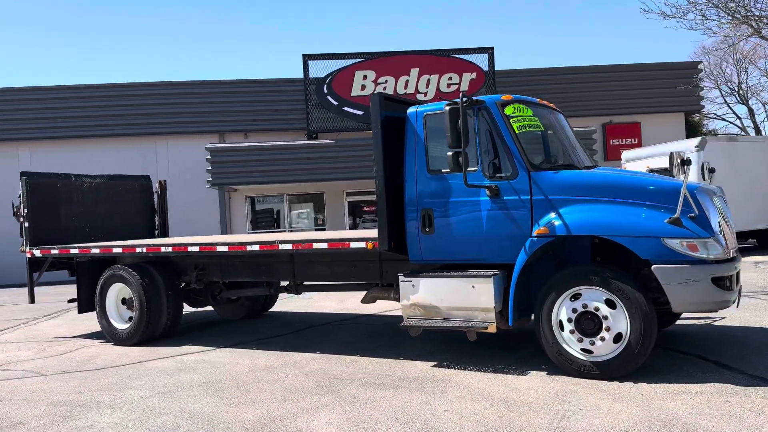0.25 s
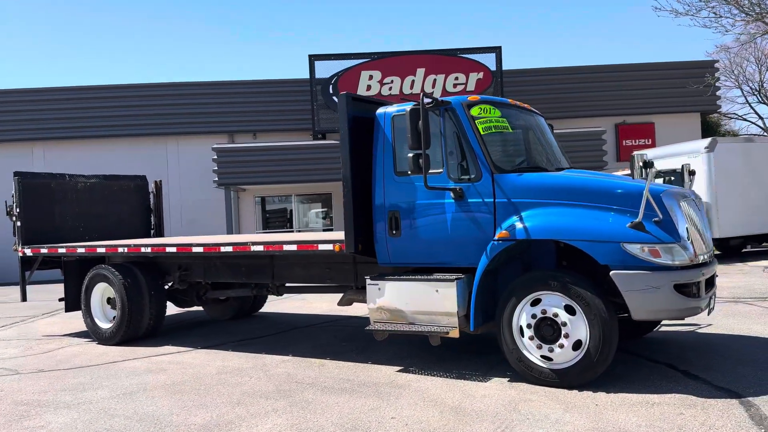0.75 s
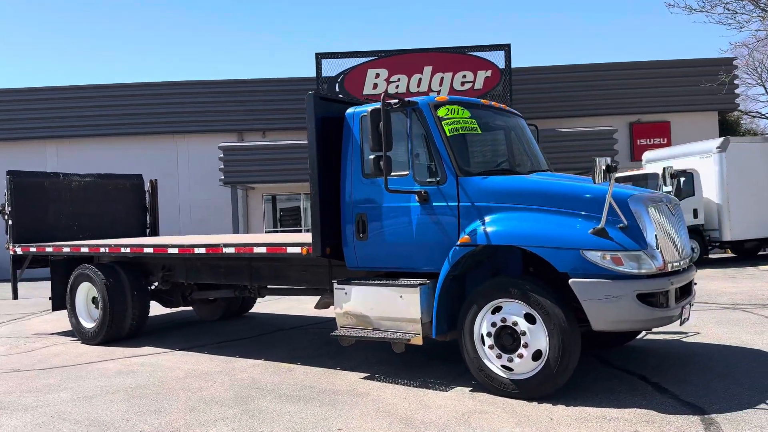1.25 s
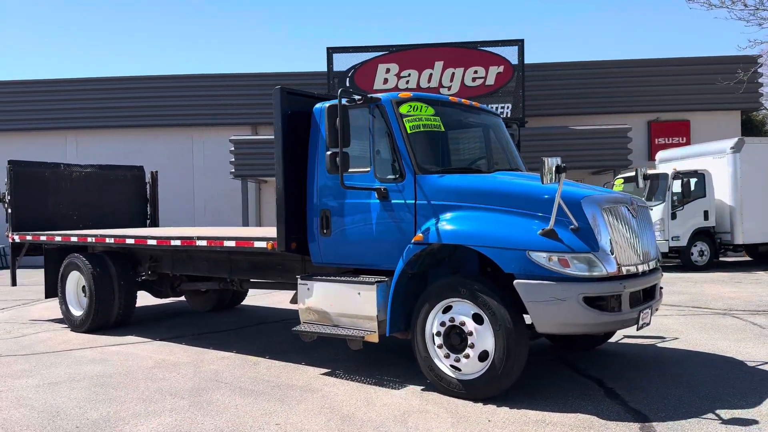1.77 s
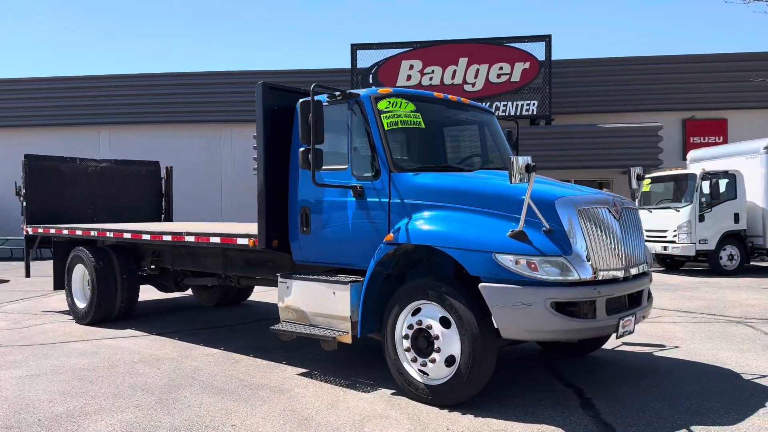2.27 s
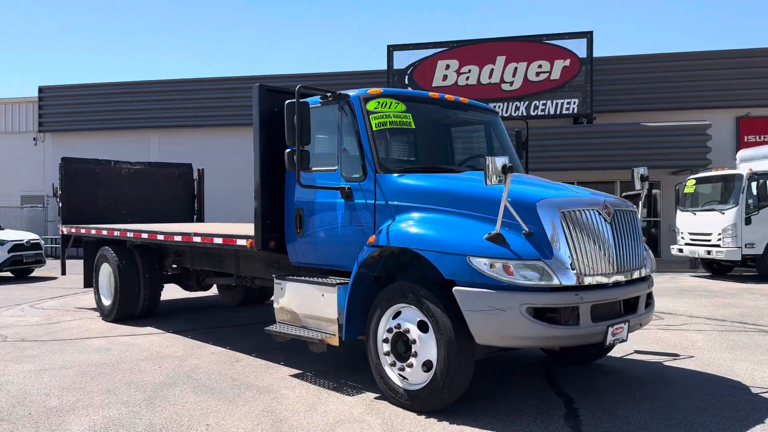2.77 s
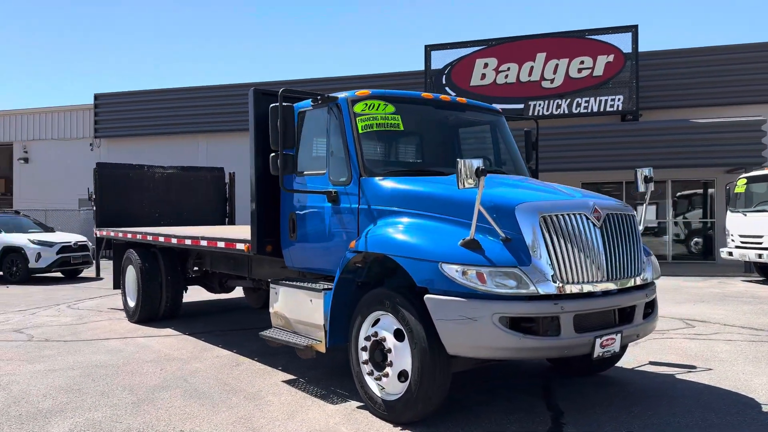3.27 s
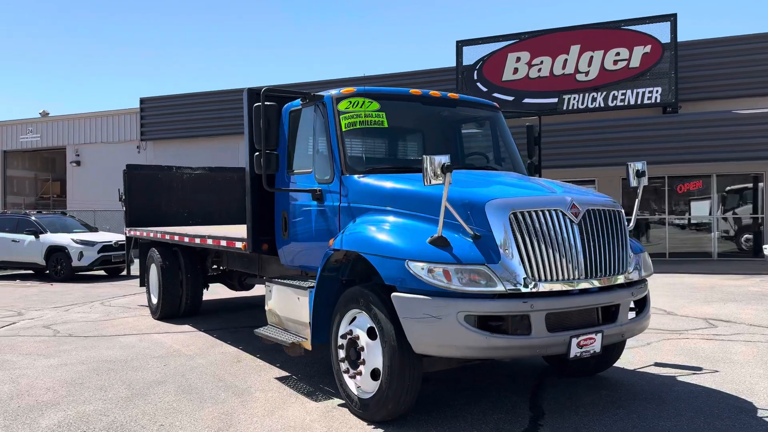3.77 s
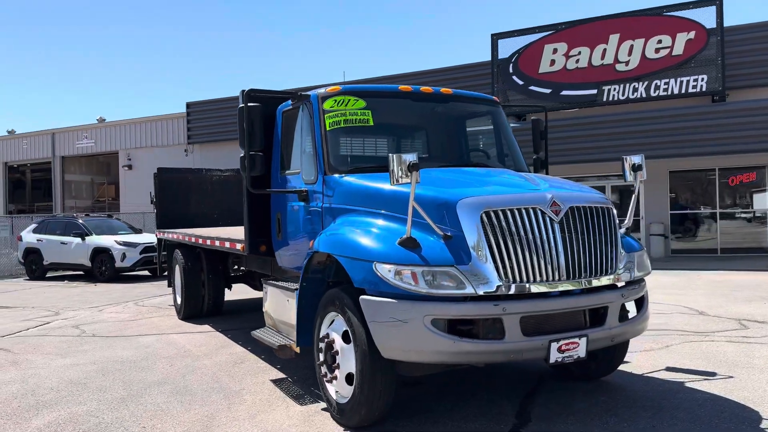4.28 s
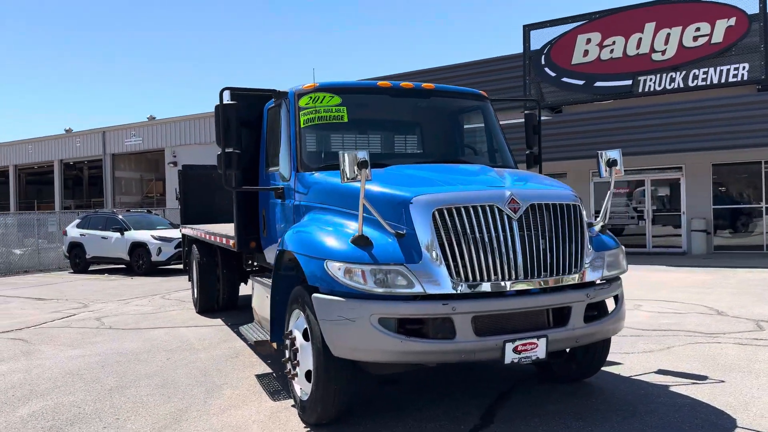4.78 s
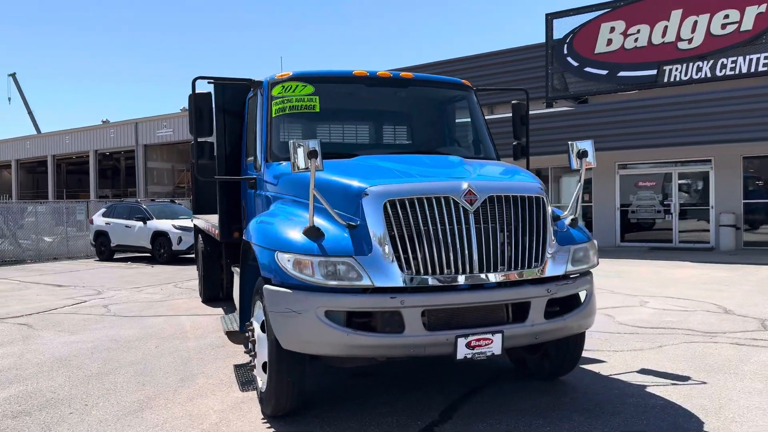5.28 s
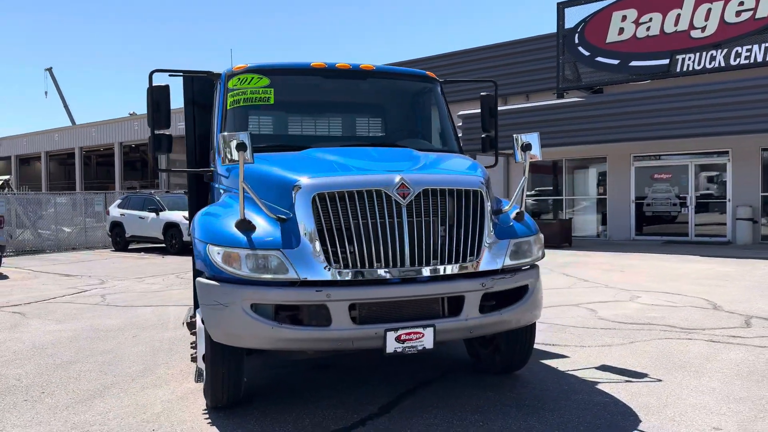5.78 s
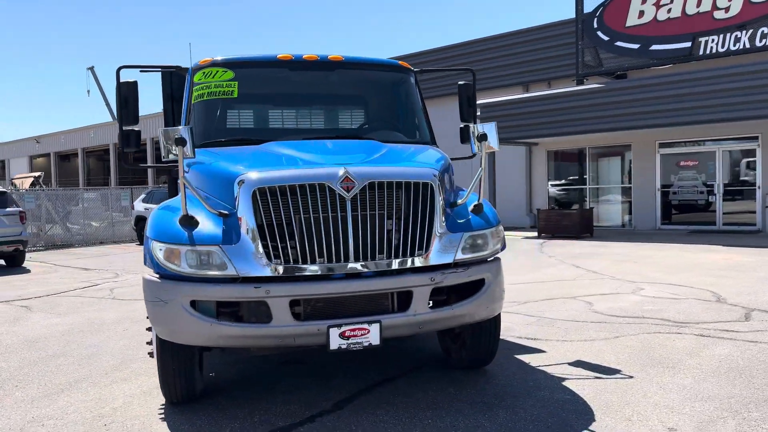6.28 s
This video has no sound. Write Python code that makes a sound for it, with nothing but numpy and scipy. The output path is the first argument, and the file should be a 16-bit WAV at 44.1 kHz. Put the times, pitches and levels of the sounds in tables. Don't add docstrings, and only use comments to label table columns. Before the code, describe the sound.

Close-up rattling diesel idle, ticking injectors and fan roar, swelling gradually as low wind thumps and hollow blowing come and go.

```python
import sys
import numpy as np
from scipy import signal
from scipy.fft import rfft, irfft
from scipy.io import wavfile
from scipy.ndimage import uniform_filter1d

SR = 44100
rng = np.random.default_rng(int(sys.argv[2]) if len(sys.argv) > 2 else 0)


def master_out(mix):
    frames = np.transpose(np.atleast_2d(mix))
    ceiling = np.clip(frames, -1, 1)
    pcm = np.round(ceiling * 32767).astype(np.int16)
    wavfile.write(sys.argv[1], SR, pcm)


def gain_from_decibels(decibels):
    exponent = np.asarray(decibels, float) / 20
    return 10 ** exponent


N = 288414
TIME = np.arange(N) / SR
CYCLE_HZ, FIRST_S = 6.259, .0225


def curves(table):
    s, *columns = np.transpose(table)
    return [np.interp(TIME, s, column) for column in columns]


def unit(x):
    return x / np.sqrt(np.mean(x ** 2))


def noise():
    return rng.standard_normal((2, N))


def colour(x, points):
    hz, db = np.transpose(points)
    grid_hz = np.maximum(np.arange(N // 2 + 1) * SR / N, 1)
    gain_db = np.interp(np.log(grid_hz), np.log(hz), db, -np.inf, -np.inf)
    return unit(irfft(rfft(x) * gain_from_decibels(gain_db), N))


def ring(x, hz, width_hz):
    return signal.lfilter(*signal.iirpeak(hz, hz / width_hz, SR), x) / np.sqrt(np.pi * width_hz / SR)


def walk(rate_hz):
    hold = int(SR / rate_hz)
    steps = np.repeat(rng.standard_normal(N // hold + 1), hold)
    return unit(uniform_filter1d(uniform_filter1d(steps, hold), hold)[:N])


def bursts(events, cycles, trim_db, spread=0.99):
    out = np.zeros((2, N))
    phase = 2 * np.pi * spread * rng.random((len(events), 2))
    for (s, db, hz), start in zip(events, phase):
        t = np.arange(int(cycles * SR / hz)) / SR
        swell = gain_from_decibels(db + trim_db) * np.sin(np.pi * t / t[-1]) ** 2
        packet = swell * np.sin(2 * np.pi * hz * t + start[:, None])
        i = int(s * SR)
        out[:, i:i + len(t)] += packet[:, :N - i]
    return out


def firings(cylinder_db, rise_s, fall_s, scatter_db):
    rate_hz = CYCLE_HZ * len(cylinder_db)
    count = (TIME - FIRST_S + 1 / CYCLE_HZ) * rate_hz
    k = count.astype(int)
    since_s = (count - k) / rate_hz
    db = np.resize(cylinder_db, k[-1] + 1) + scatter_db * rng.standard_normal(k[-1] + 1)
    return gain_from_decibels(db)[k] * 2 * (1 - np.exp(-since_s / rise_s)) * np.exp(-since_s / fall_s)


def blows(cylinder_db, scatter_db):
    echo_s = 0.0028
    s = np.arange(FIRST_S, N / SR - .01, 1 / CYCLE_HZ / len(cylinder_db))
    chance = rng.standard_normal((len(s), 2))
    i = ((s + 0.002792 + 0.0002 * chance[:, 0]) * SR).astype(int)
    out = np.zeros((2, N))
    out[0, i] = out[1, i + int(echo_s * SR)] = gain_from_decibels(np.resize(cylinder_db, len(s)) + scatter_db * chance[:, 1])
    return out


def clatter():
    size, repeat = round(SR / CYCLE_HZ), .75
    fresh = rng.standard_normal((2, N // size + 9, size))
    cycles = signal.lfilter([np.sqrt(1 - repeat ** 2)], [1, -repeat], fresh, axis=1)
    return cycles[:, 8:].reshape(2, -1)[:, :N]


# mode_hz, width_hz, steady_db, then knock_db of the six cylinders in firing order
BLOCK_MODES = [(672, 98, -11, -10, -16.5, -29, -18.5, -8.5, -14),
               (828, 130, -13, -6, -6, -9, -20, -13, -21.5),
               (1258, 158, -4.5, -6, -6, -5, -7.5, -3.5, -5.5),
               (1433, 194, -10, -16, -15, -14.5, -15, -2.5, -3),
               (1830, 610, -17.5, -21, -9, -16.5, -16.5, -7, -12),
               (2163, 148, -15, -7, -38, -8, -19, -21, -16.5),
               (2693, 216, -16.5, -10, -14.5, -16, -14.5, -11, -13.5),
               (4640, 300, -46.5, -18, -27, -34, -34, -17, -23.5)]
# pitch_hz, width_hz, level_db
GEAR_WHINE = [(819.6, 8, -14.5), (897.5, 15, -16.5), (707, 11, -21), (1235, 56, -23), (1475, 15, -18),
              (1846, 19, -17.5), (2030, 17, -19)]
# pitch_hz, level_db (per Hz)
FAN_ROAR = [(150, -14), (300, 1), (450, -2.5), (600, -8.5), (1000, -9.5), (1700, -16), (2400, -17.5),
            (3000, -28), (3300, -27.5), (4000, -52)]


def block(lower_db, sharp_db):
    out = colour(noise(), FAN_ROAR) * gain_from_decibels(0.31 * walk(9))
    for hz, width_hz, steady_db, *cylinder_db in BLOCK_MODES:
        swell = firings(cylinder_db, rise_s=.002, fall_s=.005, scatter_db=1.5)
        rattle = clatter() * (gain_from_decibels(steady_db) + 1.39 * swell)
        knock = blows(cylinder_db, scatter_db=1.5) * gain_from_decibels(sharp_db) * rng.choice([-1, 1])
        struck = rattle + knock / np.sqrt(np.pi * width_hz / SR)
        mode = ring(ring(struck, hz, width_hz), hz, 3 * width_hz) * np.sqrt(width_hz / SR) * 3
        out += mode * gain_from_decibels(lower_db if 1100 < hz < 1700 else 0)
    for hz, width_hz, db in GEAR_WHINE:
        out += gain_from_decibels(db + 2 * walk(2.4)) * ring(noise(), hz, width_hz)
    return out


# pitch_hz, level_db (per Hz)
TICK_COLOUR = [(3000, -6), (3600, 0), (4150, 0), (4700, 3), (5200, -1), (6700, -3), (7300, -6), (8800, -6),
               (9800, -10), (10900, -13.5), (11900, -10.5), (13000, -10), (15600, -11), (15800, -30)]
LOW_TICKS = [6, 2, -2, -2, 4, -3.5]
HIGH_TICKS = [5.9, 10.8, 2.3, 3.4, 9.1, 8.6]


def ticking():
    split_hz = 6500
    parts = np.zeros((2, N))
    for kind, cylinder_db in (("low", LOW_TICKS), ("high", HIGH_TICKS)):
        swell = 0.7 + firings(cylinder_db, rise_s=.012, fall_s=.011, scatter_db=2.5)
        half = signal.butter(4, split_hz, kind, fs=SR, output="sos")
        parts += signal.sosfilt(half, noise() * gain_from_decibels(0.86 * walk(11)) * swell)
    return gain_from_decibels(0.27 * walk(5.4)) * colour(parts, TICK_COLOUR)


# start_s, engine level_db, knock sharpness_db
APPROACH = [
    (0, -37.5, 3.5),
    (1.2, -35, -5),
    (2.5, -34, 1),
    (4.4, -32, -4.5),
    (5.6, -31.5, 3.5),
    (6.54, -31, 7.5),
]


def engine():
    block_db, sharp_db = curves(APPROACH)
    closer_db = block_db + 34.5
    lower_db = -4 + .1 * closer_db
    tick_db = -17 + 0.33 * closer_db
    return gain_from_decibels(block_db + 1.5) * (block(lower_db, sharp_db) + gain_from_decibels(tick_db) * ticking())


def slaps(parts, first_s, rate_hz, cycles):
    s = np.arange(first_s, N / SR, 1 / rate_hz)
    best_db, hz, best_s, loss_db = np.transpose(parts)[:, :, None]
    db = best_db - loss_db * np.abs(s - best_s)
    chance = rng.standard_normal((len(s), 2))
    level_db = db.max(0) + 1.2 * chance[:, 0]
    pitch_hz = hz[db.argmax(0), 0] * (1 + 0.0053 * chance[:, 1])
    events = np.transpose([s, level_db, pitch_hz])
    hit = bursts(events, cycles, trim_db=-6.5, spread=0.23)
    return hit + bursts(events, 2.4 * cycles, trim_db=-8, spread=0.21)


# peak level_db, pitch_hz, best_s (where best heard), loss_db (per second away from there)
SLAP = (-16.5, 1462, 7, 1.5)
SLAP_LOWER = (-19.5, 1299, 5.5, 4.5)
COVER = (-24, 2070, 4, 5.5)
COVER_GRILLE = (-31.5, 2061, 5.5, 1)


def loose_parts():
    slap_s = .1298
    slap = slaps([SLAP], slap_s, CYCLE_HZ, cycles=9.8)
    lower = slaps([SLAP_LOWER], slap_s + .009, CYCLE_HZ, cycles=8.5)
    return slap + lower + slaps([COVER, COVER_GRILLE], .0752, 2 * CYCLE_HZ, cycles=23.4)


# start_s, peak level_db, pitch_hz
METAL_PINGS = [
    (1.9449, -52, 14600),
    (5.4858, -43, 14700),
    (5.9328, -32, 14800),
]


def pings():
    return bursts(METAL_PINGS, cycles=60, trim_db=-3)


HOLLOW_HZ = 123.5


def puffs(events):
    s, db, hz = np.transpose(events)
    since_s = TIME[::64] - s[:, None] - 1.7 / hz[:, None]
    return (gain_from_decibels(db - 12.5) * hz / HOLLOW_HZ) @ np.exp(-(since_s / 0.024) ** 2)


# start_s, gust level_db, hollow_db (note above the gust as air crosses the opening)
GUSTS = [(0, -27, 3), (.33, -23.5, 0), (1.06, -26.5, 3), (1.2, -22, -3), (1.42, -21, -3.5),
         (1.55, -24.5, -4.5), (1.86, -20.5, -5.5), (2.1, -19.5, -1), (2.24, -29.5, -1), (2.5, -31, -3),
         (2.85, -26.5, -3), (3.4, -36, 2.5), (3.5, -33.5, 8), (3.86, -28, 9), (4.1, -25.5, 1),
         (4.22, -30.5, -1), (5.2, -32, -1.5), (6.3, -26.5, -5)]
# pitch_hz, level_db (per Hz)
BUFFET_COLOUR = [(12, -42.5), (20, -34.5), (51, 3), (92, 4.5), (110, 4.5), (140, -43.5), (240, -120)]
# pitch_hz, level_db (per Hz)
FLUTTER_COLOUR = [(79, -50), (135, 0.5), (187, -7), (227, -8.5), (482, -26.5), (574, -28), (600, -24.5),
                  (780, -45), (1320, -120)]
# start_s, peak level_db, pitch_hz
PORT_EDDIES = [(0.128, -17, 125), (0.31, -9, 65.4), (0.43, -6.5, 70), (0.698, -7, 76.4), (0.849, -11, 131),
               (0.907, 1.5, 112), (0.96, -10.5, 100), (1.135, -6, 101), (1.2, -4, 65), (1.28, -14, 67.6),
               (1.399, -1.5, 118), (1.644, -1, 190), (1.687, -14, 86), (1.729, -4, 174), (1.771, -4.5, 111),
               (1.819, -2.5, 122), (1.858, -1, 171), (1.87, -11, 69.5), (2.041, -1.5, 125),
               (2.088, -2.5, 110), (2.151, -6, 157), (2.779, -17, 100), (4.059, -7.5, 128),
               (4.495, -10, 126), (4.777, -9, 92), (4.919, -12, 187), (4.959, -8.5, 106), (5.589, -23, 147),
               (6.168, -7, 114), (6.329, -17, 93)]
# start_s, peak level_db, pitch_hz
AIR_FLICKS = [(1.731, -19, 416), (1.86, -22, 284), (2.236, -14, 359), (2.262, -16.5, 440), (3.75, -22, 290),
              (1.85, -16.5, 494), (4.7, -19, 220), (2.81, -20.5, 249), (3.68, -20.5, 282),
              (4.097, -10, 296), (4.149, -19.5, 310), (4.303, -22, 292), (4.789, -19, 248),
              (6.17, -16, 337), (6.301, -20.5, 245), (6.425, -19, 300)]


def wind():
    gust_db, across_db = curves(GUSTS)
    hollow_db = gust_db + across_db
    mid_db = -25
    excess_db = gust_db - mid_db
    eddying = walk(30)
    deep_db = mid_db - 0.5 + 1.1 * excess_db + 0.65 * eddying + 2.5 * walk(9)
    deep = gain_from_decibels(deep_db) * colour(noise(), BUFFET_COLOUR)
    pitch_hz = HOLLOW_HZ + 1.513 * np.array([walk(14), walk(21)])
    tone = unit(np.sin(2 * np.pi * np.cumsum(pitch_hz, axis=1) / SR))
    hollow = gain_from_decibels(hollow_db + 1.1 * walk(25)) * tone
    hollow += gain_from_decibels(hollow_db - 8.5) * ring(noise(), HOLLOW_HZ, 21)
    stirred = gain_from_decibels(mid_db - 2 + 0.71 * excess_db)
    stirred += gain_from_decibels(-12.5) * np.interp(TIME, TIME[::64], puffs(PORT_EDDIES))
    flutter = stirred * gain_from_decibels(1.92 * eddying) * colour(noise(), FLUTTER_COLOUR)
    eddies = bursts(PORT_EDDIES, cycles=3.62, trim_db=-6.5)
    flicks = bursts(AIR_FLICKS, cycles=4.1, trim_db=1.5)
    return deep + hollow + flutter + eddies + flicks


# pitch_hz, pan_db (left minus right), flank_rad and grille_rad
MIC_PORTS = [(30, 1, 0.9, -0.59, 0.76), (120, 0, -0.6, -0.41, 0.97), (444, 2, -0.8, -0.73, 0.9),
             (574, -0.5, -5, -0.76, 1), (660, -7.5, -1.6, -1, 0.06), (860, -10.5, 0.1, 1.5, 0.9),
             (970, -0.5, -0.6, -0.27, 0.9), (1470, -7.5, -3, -0.94, 1), (2070, -8.5, -2, 1.25, 0.78),
             (2700, -3, -0.8, 1.3, 0.8),
             (3200, 1, .1, .3, .65), (3700, 1, .1, 1.5, .3), (4300, 1, .4, .4, .55),
              (4800, 1, .2, .5, .45), (5500, 0, 3, 3, .35), (6400, 1, .3, .3, .4), (7200, 2, 2.4, 2.4, .5),
              (8100, 1, 3.14, 3.14, .9), (9000, 0, 3.14, 3.14, .995), (10800, 0, 3.14, 3.14, .99),
              (11600, 0, 2.5, 2.5, .6), (12900, 0, 1.5, 1.5, .6), (14000, 0, .8, .8, .6),
              (15300, 0, 0, 0, .99)]
# start_s, way (flank 0 to grille 1)
PHONE_TURN = [
    (0, 0.47),
    (3.2, 0.71),
    (5.7, 0.94),
    (6.54, 1.28),
]


def ports(sound):
    hz, s, (direct, other) = signal.stft(sound, SR, nperseg=512)
    at_hz, *columns = np.transpose(MIC_PORTS)
    pan_db, flank, grille, like = (np.interp(hz, at_hz, c)[:, None] for c in columns)
    way = np.interp(s, *np.transpose(PHONE_TURN))
    lead = np.exp(.5j * (flank + (grille - flank) * way))
    shared = np.sqrt((1 + like) / 2) * direct
    apart = np.sqrt((1 - like) / 2) * other
    left = (shared + apart) * lead * gain_from_decibels(pan_db / 2)
    right = (shared - apart) / lead * gain_from_decibels(-pan_db / 2)
    return signal.istft(np.array([left, right]), SR, nperseg=512)[1][:, :N]


def scene():
    return ports(engine() + loose_parts() + pings() + wind())


def roll_off(x):
    return signal.sosfilt(signal.butter(12, 15800, fs=SR, output="sos"), x)


def record(dry):
    limit = .9
    return roll_off(limit * np.tanh(dry / limit))


dry = scene()
out = record(dry)
master_out(out)
```